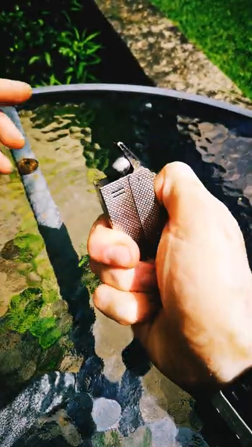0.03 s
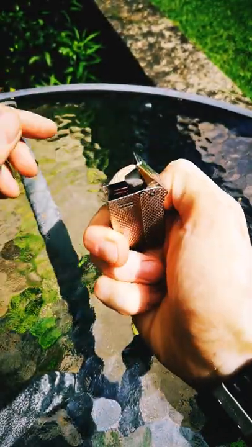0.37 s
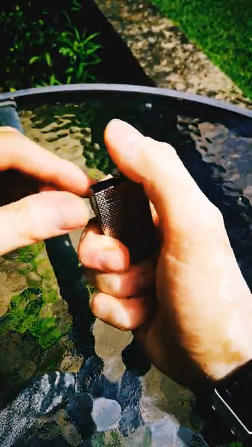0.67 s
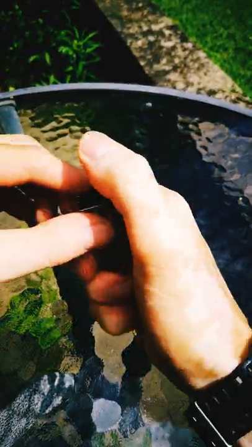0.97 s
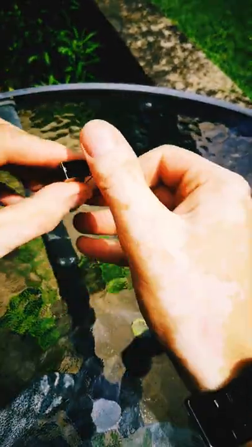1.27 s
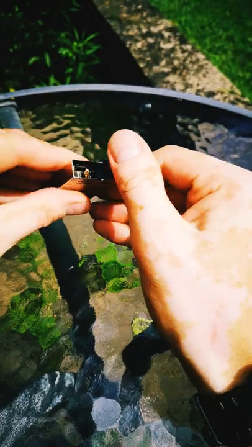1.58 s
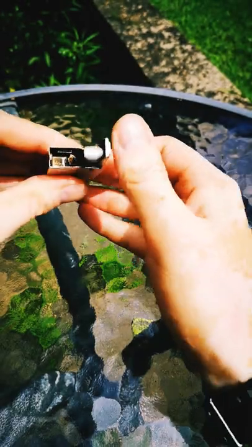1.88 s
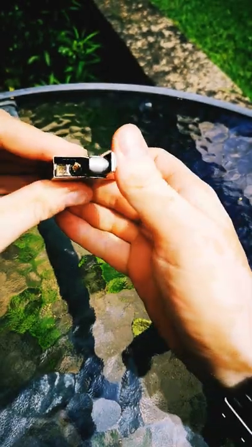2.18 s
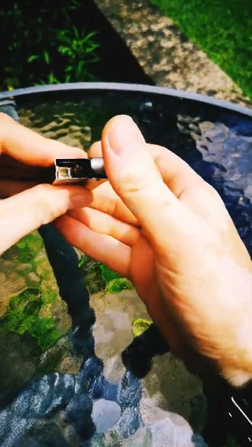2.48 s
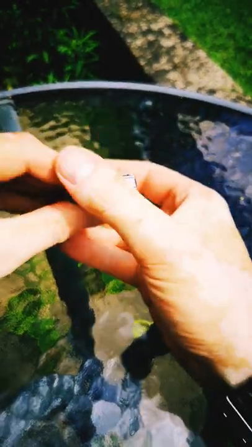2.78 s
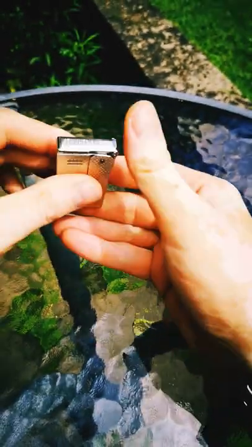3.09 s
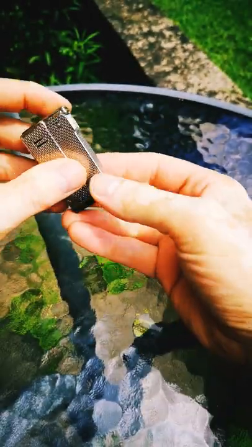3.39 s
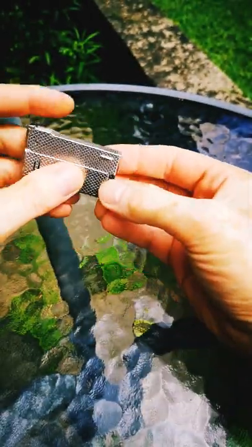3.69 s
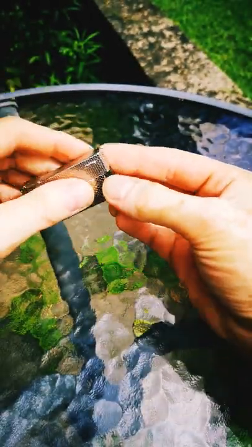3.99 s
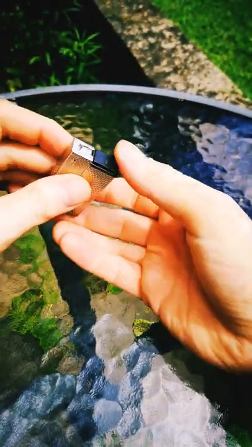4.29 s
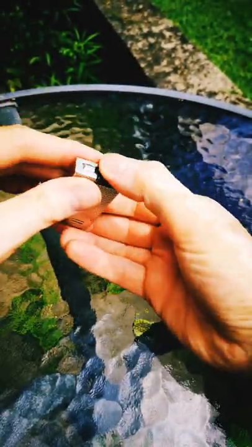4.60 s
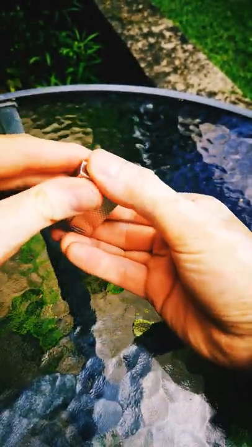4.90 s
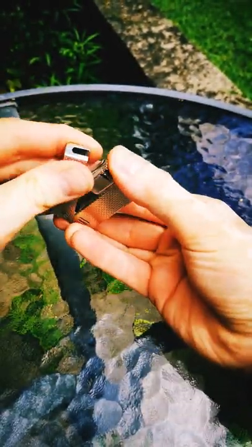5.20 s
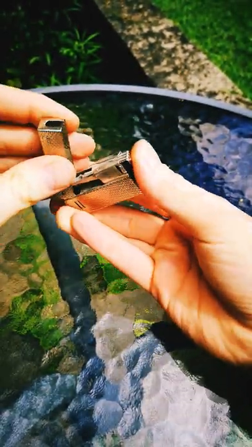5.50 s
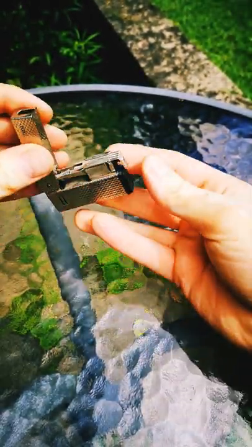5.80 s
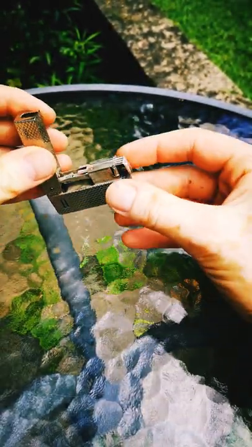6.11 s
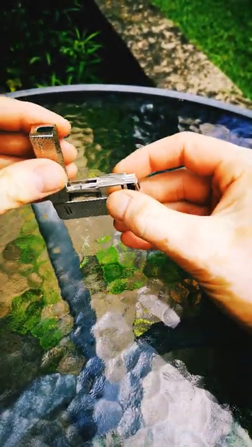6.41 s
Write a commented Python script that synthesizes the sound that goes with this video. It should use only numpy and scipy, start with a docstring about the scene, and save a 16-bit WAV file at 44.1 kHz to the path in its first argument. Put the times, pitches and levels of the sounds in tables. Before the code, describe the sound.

A metal pocket lighter clicks, scrapes and snaps shut in someone's hands outdoors, over a low rumble and faint far traffic.

```python
"""In a garden, over a glass table, someone handles a metal pocket lighter close by.
Its parts slide, catch and snap on the case, which rings briefly; the hands bump dully now and then.
Clicks, scrapes and bumps are short bursts of filtered noise; the lid's ping is two fading tones.
A low rumble swells with the bumps; behind it lie far traffic and a hum that swells and fades."""
import sys
import numpy as np
from scipy import signal
from scipy.fft import rfft, irfft
from scipy.io import wavfile
from scipy.ndimage import uniform_filter1d

SR = 44100
rng = np.random.default_rng(int(sys.argv[2]) if len(sys.argv) > 2 else 0)


def dump(signal):
    """Clip the signal to [-1, 1] and save it as 16-bit WAV at the path in sys.argv[1]."""
    limited = np.clip(np.atleast_2d(signal).T, -1, 1)
    pcm = np.round(limited * 32767).astype(np.int16)
    wavfile.write(sys.argv[1], SR, pcm)


N = 293265

# Parts catch: the lid snaps shut near 2.8 s and is prised open again from 4.7 s.
# t/s, starting level/dB of the middle band (3.5-8 kHz), body/dB relative to that band, spot
CATCHES = [(1.579, -29.5, 4.5, "insert"), (1.584, -35.5, 8, "insert"), (1.5975, -53, 11, "knurl"),
           (2.7712, -34.5, 6, "corner"), (2.7937, -32, 18, "catch"), (2.813, -10, 1, "rim"),
           (2.8279, -48, -14, "side"), (2.8775, -53, 9.5, "side"), (2.9107, -48.5, 10, "side"),
           (2.9289, -38, 7, "shell"), (2.9502, -61, 16.5, "shell"), (2.965, -62, 9.5, "shell"),
           (3.1217, -54, -2, "hinge"), (4.7443, -55.5, 4, "lip"), (4.7781, -50.5, 7.5, "lip"),
           (5.116, -59.5, 15.5, "lip"), (5.1262, -46.5, 0.5, "corner"), (5.162, -28, -2, "hinge"),
           (5.1662, -35.5, -0.5, "hinge"), (5.2224, -52.5, -6, "hinge"), (5.25, -63, 4, "hinge"),
           (5.277, -62, -5, "corner"), (5.315, -62.5, 12, "spring"), (5.587, -55.5, -9, "hinge"),
           (5.6, -70, 11, "spring"), (5.627, -66.5, 1, "hinge"), (5.655, -61, -10, "corner"),
           (5.707, -48, -2, "stop")]
# Parts slide: t/s of hardest pressure, rise/s, fall/s, middle band level/dB, relative body/dB, spot
SCRAPES = [(0.011, .012, 0.067, -71.5, 6.5, "knurl"), (.527, .022, .027, -66.5, 10, "knurl"),
           (.8, 0.021, .019, -70.5, 7, "knurl"), (.985, 0.025, .066, -77.5, 15, "knurl"),
           (1.47, .035, .044, -75, 9, "knurl"), (1.563, .005, .01, -65.5, 14.5, "insert"),
           (1.58, 0.0088, .014, -47.5, 10.5, "insert"), (2.768, .016, 0.0048, -55, 3, "hinge"),
           (2.811, 0.027, 0.0049, -40, 0, "catch"), (2.915, .07, 0.05, -58, 7.5, "side"),
           (4.215, .035, .045, -77, 2, "hinge"), (5.147, .031, 0.014, -46, 4.5, "hinge"),
           (5.163, .032, 0.014, -38, 0.5, "hinge"), (5.25, .079, 0.083, -64, 1, "hinge"),
           (5.531, .036, 0.018, -65, -1.5, "hinge"), (5.655, 0.06, 0.073, -70.5, -8, "stop")]
# How each named spot sounds where parts meet (edge and cavity are relative to the middle band):
# edge/dB, clink f/Hz, clink boost/dB, bright f/Hz, cavity/dB, lid ring/dB, fade/s, free ring/dB, pan/dB
# A fade, or t60, is the time a sound takes to drop by 60 dB.
CONTACT_SPOTS = {"insert": (-19, 2930, -3, 7400, -25, -15, 0.0254, -9, -2.5),
                 "knurl": (-10, 2680, 5, 7500, 0, -10, .045, -11, -2),
                 "corner": (-1.5, 2520, 0, 6000, -3, 9, .016, -9, 1.5),
                 "catch": (-11, 2584, 7, 6100, -9, 12, 0, -12, -1.5),
                 "rim": (-6.5, 2256, -14, 6253, -8, 11, 0.0112, -6, -2.5),
                 "side": (-4, 2720, 2.5, 5900, 3, -12, 0.0656, -2, -6.5),
                 "shell": (-8, 1990, 7, 5800, -6, -12, 0.056, 6.5, -5.5),
                 "lip": (-12, 2450, 7, 5900, -14, -12, 0.0352, -10, -3),
                 "hinge": (-10.5, 3030, 9, 5920, -24, -15, 0.0477, -11, -1),
                 "spring": (-16, 2060, 15, 5900, -10, -15, 0.08, -11, -3),
                 "stop": (-5.5, 3130, 25, 6250, -20, 12, 0.0233, 7, 0)}
# Pitches that the hand-damped case boosts or weakens: f/Hz, width/Hz, gain/dB
CASE_COLOUR = [(1809.4, 250, 5), (2590, 190, 9), (3318.1, 240, 5), (3990, 180, 3), (4814.8, 200, -3),
               (5270, 280, 6.5), (5876, 160, 3), (6738, 440, 3), (9200, 364, 6), (13710, 1200, 4)]
# Pitches at which the metal rings longer: f/Hz, gain/dB, fade/s
METAL_RINGS = [(1631, -8.5, .22), (2003, -6, 0.13), (2419.3, -5, .3), (3021, -7.5, .13), (3370, -5.5, .15),
               (3718, -4.5, .2), (4016, -6, .19), (5330, -10.5, .12), (5652, -5.5, .13), (5824, -5, 0.07),
               (6551, -10.5, 0.076), (7900, -8, .11), (8400, -4, .09)]
# Pitches at which the lid's wall rocks: f/Hz, width/Hz, gain/dB
LID_WALL_RINGS = [(3780, 410, 0.5), (4000, 20, -2)]
# The lid still sings from being flipped open: f/Hz, starting level/dB, fade/s
LID_TONES = [(3726, -64.5, 0.98), (5655, -75, 0.3574)]
# Soft bumps of the hands: t/s, level/dB, top f/Hz, fade/s, side/dB
# "Mid" is the sound that left and right share; "side" pushes one while it pulls the other.
HAND_BUMPS = [(2.812, -33.5, 1900, .012, -1), (2.877, -40, 620, .16, -1.5), (2.886, -32.5, 142, .19, -14),
              (2.91, -39, 161, .28, -9), (2.911, -42.5, 480, .1, -1), (2.928, -42, 520, .08, -1),
              (2.946, -46, 476, .12, 1), (5.16, -48.5, 380, 0.089, -3), (5.162, -50.5, 1400, .04, -1),
              (5.21, -47, 170, .2, -15), (5.245, -44.5, 200, .12, -10), (5.309, -52, 140, .2, -10)]
# Low rumble, from deep to high: f/Hz, relative level/dB
RUMBLE_SPECTRUM = [(15, -5.5), (30, -0.5), (54, 2), (68, -0.5), (85, -13), (115, -13.5), (150, -19),
                   (190, -16), (260, -21), (340, -24), (420, -42.5)]
# The low rumble swells with the hands' dull bumps near 2.85 s and 5.3 s: t/s, level/dB before its trim
RUMBLE_CURVE = [(0, -50), (2.5, -51.5), (2.85, -46), (3.2, -53.5), (4.7, -53.5), (5.3, -47.5), (5.8, -52),
                (6.65, -53)]
# Far traffic and air, the mid part and the side part: f/Hz, relative level/dB
TRAFFIC_MID = [(60, -11), (400, -8.5), (620, -12.5), (850, -4), (1080, 0), (1420, -8), (1750, -6.5),
               (3100, -20.5), (5500, -24.5), (8500, -30.5), (15500, -35)]
TRAFFIC_SIDE = [(20, -11), (50, -5), (100, -11), (320, -4.5), (480, -8), (750, -4.5), (1100, -2.5),
                (1450, -10), (1900, -8), (3500, -21.5), (5500, -23), (8500, -30), (15500, -33)]
# Swells of the hum's tone and of the blurred band below it: peak t/s, length/s, level/dB
HUM_TONE_SWELLS = [(.2, 0.88, -67), (1.15, 0.45, -70), (1.83, 0.63, -66.5), (3.35, 0.43, -75.5)]
HUM_BLUR_SWELLS = [(.24, 0.13, -50.5), (.46, .22, -57), (1.22, 0.28, -62), (1.62, .3, -65),
                   (6.36, 0.31, -62)]


def clicks():
    """Each catch is a sudden force that the fingers quickly damp; the spot sets its colour and ring."""
    out = np.zeros((2, N))
    for s, db, body_db, spot in CATCHES:
        *colour, lid_db, t60, ring_db, pan_db = CONTACT_SPOTS[spot]
        strike = contact(dying(t60), db, body_db, *colour)
        strike = metal_ring(strike, ring_db)
        add(out, s, panned(strike + lid_ring(strike, lid_db), pan_db))
    return out


def slides(slips_per_s=520, uneven_db=3.5, ends_db=-16, clink_share=.6):
    """Metal rubs on metal in quick uneven slips while the pressure rises and falls."""
    out = np.zeros((2, N))
    for s, rise, fall, db, body_db, spot in SCRAPES:
        edge_db, clink_hz, clink_db, bright_hz, cavity_db, *_ = CONTACT_SPOTS[spot]
        t = np.arange(0, rise + fall, 1 / SR)
        pressure_db = np.interp(t, [0, rise, rise + fall], [ends_db, 0, ends_db])
        force = from_db(pressure_db + uneven_db * wobble(t, slips_per_s))
        scrape = contact(force, db, body_db, edge_db, clink_hz, clink_share * clink_db,
                         bright_hz, cavity_db)
        add(out, s - rise, scrape)
    return panned(out + lid_ring(out, db=-6), pan_db=-2)


def contact(force, db, body_db, edge_db, clink_hz, clink_db, bright_hz, cavity_db):
    """A force shakes the case: a hollow cavity, a clinking body, a bright middle and a hard edge."""
    force = np.pad(force, (0, SR // 100))
    shake = noise_burst(force)
    for hz, width_hz, gain_db in CASE_COLOUR:
        shake = shake + (from_db(gain_db) - 1) * resonance(shake, hz, width_hz)
    clink = from_db(clink_db) * resonance(shake, clink_hz, width_hz=150)
    bright = from_db(1.5) * resonance(shake, bright_hz, width_hz=1100)
    cavity = band(shake, 1569, 1829)  # the air inside the case
    body = band(shake + clink, 0.74975 * clink_hz, 1.26 * clink_hz, order=4)
    middle = band(shake + bright, 3500, 7790, order=3)
    top = band(shake, 10300, 15000, order=3)
    edge = band(shake, 8100, 10000, order=3) + from_db(-9) * top
    # this close, left and right hear the case mostly out of step
    out = (from_db(body_db) * spread(body, side_db=1)
           + spread(middle, side_db=0)
           + from_db(edge_db) * panned(spread(edge, side_db=0), pan_db=5.5)
           + from_db(cavity_db) * spread(cavity, side_db=1))
    return from_db(db) * rms(force) * out


def metal_ring(strike, ring_db):
    """A strike with the metal's ring added, strong only when the fingers leave it free."""
    strike = np.pad(strike, ((0, 0), (0, SR // 4)))
    ring = sum(from_db(db) * resonance(strike, hz, width_hz=np.log(1000) / (np.pi * t60))
               for hz, db, t60 in METAL_RINGS)
    return strike + from_db(ring_db) * ring


def lid_ring(shake, db):
    """A contact rocks the lid's wall, which pushes air to one side and pulls it from the other."""
    side = (shake[0] - shake[1]) / 2
    rocking = sum(from_db(db + gain_db) * resonance(side, hz, width_hz)
                  for hz, width_hz, gain_db in LID_WALL_RINGS)
    return left_right(0, rocking)


def lid_ping(finger_s=0.08416, stop_db_per_s=250):
    """The lid's two pure tones fade, then a finger stops them."""
    t = np.arange(N) / SR
    finger_db = -stop_db_per_s * np.clip(t - finger_s, 0, 1)
    return sum(np.sqrt(2) * from_db(db - 60 * t / t60 + finger_db) * np.sin(2 * np.pi * hz * t)
               for hz, db, t60 in LID_TONES)


def hand_bumps(low_hz=88):
    """Soft flesh gives short dull thuds."""
    out = np.zeros((2, N))
    for s, db, top_hz, t60, side_db in HAND_BUMPS:
        force = np.pad(dying(t60), (0, SR // 30))
        thud = band(noise_burst(force), low_hz, top_hz, order=4)
        add(out, s, from_db(db) * rms(force) * spread(thud, side_db))
    return out


def garden_echo(sound, t60=.24, echo_db=-25, gap_s=.006):
    """Table, paving and wall scatter back a short, duller tail."""
    decay = dying(t60)
    scatter = rng.standard_normal((2, len(decay))) * decay
    echoes = band(scatter, 300, 7500, order=1) / np.sqrt(np.sum(decay ** 2))
    echoes = np.pad(echoes, ((0, 0), (int(gap_s * SR), 0)))
    return from_db(echo_db) * signal.fftconvolve(sound, echoes, axes=1)[:, :N]


def rumble_and_traffic(rumble_trim_db=-.5, mid_db=-67, side_db=-67.5):
    """A low rumble swells with the hands' dull bumps, under a steady wash of far traffic."""
    level_db = np.interp(np.arange(N) / SR, *np.transpose(RUMBLE_CURVE))
    rumble = from_db(level_db + rumble_trim_db) * steady_noise(RUMBLE_SPECTRUM)
    traffic_mid = from_db(mid_db) * steady_noise(TRAFFIC_MID)
    traffic_side = from_db(side_db) * steady_noise(TRAFFIC_SIDE)
    return left_right(rumble + traffic_mid, traffic_side)


def hum(tone_hz=328, blur_hz=240.4, tone_rest_db=-79, blur_rest_db=-71, side_share=.35):
    """A distant hum: a wavering tone over a blurred lower band, with one rising tone near the end."""
    t = np.arange(N) / SR
    blur = rms_one(band(rng.standard_normal(N), .88 * blur_hz, 1.1 * blur_hz))
    blur *= from_db(blur_rest_db) + swells(t, HUM_BLUR_SWELLS)
    waver_hz = 2.6 * np.interp(t * 10, np.arange(80), rng.standard_normal(80))
    flutter = from_db(3 * wobble(t, per_s=14))
    strength = from_db(tone_rest_db) + swells(t, HUM_TONE_SWELLS)
    wavering = tone(tone_hz + waver_hz, flutter * strength)
    peak_s, length_s, peak_db, peak_hz, glide_hz_per_s = 6.28, .27, -51.5, 232, 150
    rising = tone(peak_hz + glide_hz_per_s * (t - peak_s), swells(t, [(peak_s, length_s, peak_db)]))
    tones = wavering + rising
    return left_right(blur + tones, -side_share * tones)


def from_db(db):
    """Turn decibels into a number to multiply by."""
    return 10 ** (np.asarray(db) / 20)


def rms(x):
    """The average strength of a signal (root mean square)."""
    return np.sqrt(np.mean(x ** 2) + 1e-20)


def rms_one(x):
    """Scale a signal to an average strength of 1."""
    return x / rms(x)


def band(x, low_hz, high_hz, order=2):
    """Keep the pitches between two limits; a higher order cuts more sharply."""
    return signal.sosfilt(signal.butter(order, [low_hz, high_hz], "band", fs=SR, output="sos"), x)


def resonance(x, hz, width_hz):
    """Ring at one pitch, with gain 1 there; the narrower, the longer it rings."""
    r = np.exp(-np.pi * width_hz / SR)
    feed = np.array([1, 0, -1]) * (1 - r * r) / 2
    feedback = [1, -2 * r * np.cos(2 * np.pi * hz / SR), r * r]
    return signal.lfilter(feed, feedback, x + 1e-18)


def dying(t60):
    """A curve that fades from 1 by 60 dB in t60 seconds."""
    return np.exp(-np.log(1000) * np.arange(int(t60 * SR)) / (t60 * SR))


def wobble(t, per_s):
    """A random curve between -2 and 2 that heads for a new value per_s times a second."""
    return np.interp(t * per_s, np.arange(256), np.clip(rng.standard_normal(256), -2, 2))


def swells(t, rows):
    """Each row is a smooth, bell-shaped rise and fall in strength."""
    return sum(from_db(db) * np.cos(np.pi * np.clip((t - s) / length, -.5, .5)) ** 2
               for s, length, db in rows)


def tone(hz, strength):
    """A pure tone that follows a pitch curve and a strength curve."""
    return np.sqrt(2) * strength * np.sin(2 * np.pi * np.cumsum(hz) / SR)


def noise_burst(force):
    """Two noises that follow a force, spread evenly over pitch as from a sharp contact."""
    noise = rng.standard_normal((2, len(force)))
    for _ in range(4):
        spectrum = rfft(noise * force)
        noise = irfft(spectrum / (np.abs(spectrum) + 1e-12), len(force))  # even over pitch
        noise = noise / np.sqrt(uniform_filter1d(noise ** 2, size=64) + 1e-9)  # even over time
    return noise * force


def steady_noise(spectrum):
    """Noise of strength 1 with the given balance of low and high pitches."""
    hz, db = np.transpose(spectrum)
    log_hz = np.log(np.arange(N // 2 + 1) * SR / N + 1)
    gain = from_db(np.interp(log_hz, np.log(hz), db, left=-80, right=-80))
    return rms_one(irfft(rfft(rng.standard_normal(N)) * gain, N))


def left_right(mid, side):
    """Left and right from their shared and opposed parts."""
    return np.array([mid + side, mid - side])


def spread(two, side_db):
    """Make two unrelated signals a balanced left and right of strength 1; more side sounds wider."""
    first, second = map(rms_one, two)
    mid = rms_one(first + second)
    side = from_db(side_db) * rms_one(first - second)
    return rms_one(left_right(mid, side))


def panned(x, pan_db):
    """Make the left louder than the right by pan_db."""
    return x * from_db(np.array([[.5], [-.5]]) * pan_db)


def add(out, s, sound):
    """Mix a sound in, starting at s seconds."""
    at = max(int(s * SR), 0)
    out[:, at:at + sound.shape[1]] += sound[:, :N - at]


def scene():
    """The lighter and its echoes, the hands, and the garden behind."""
    lighter = clicks() + slides() + lid_ping()
    return lighter + garden_echo(lighter) + hand_bumps() + rumble_and_traffic() + hum()


def record(dry):
    """Clip any peak beyond full scale, then cut the treble above 15400 Hz."""
    treble_cut = signal.ellip(10, .1, 80, 15400, fs=SR, output="sos")
    return signal.sosfilt(treble_cut, np.clip(dry, -1, 1))


dry = scene()
out = record(dry)
dump(out)
```